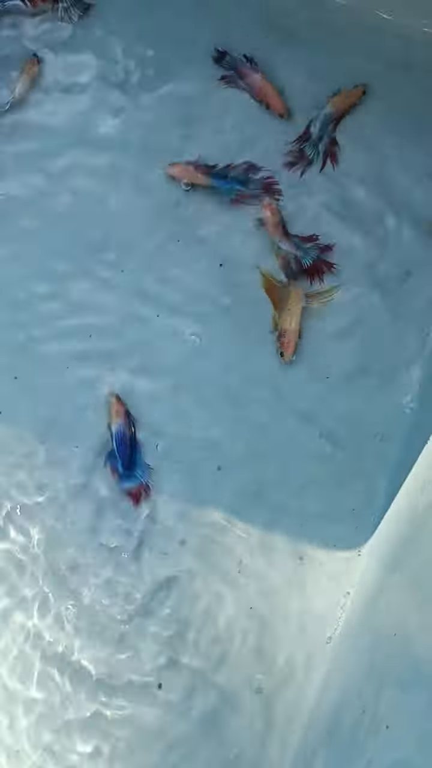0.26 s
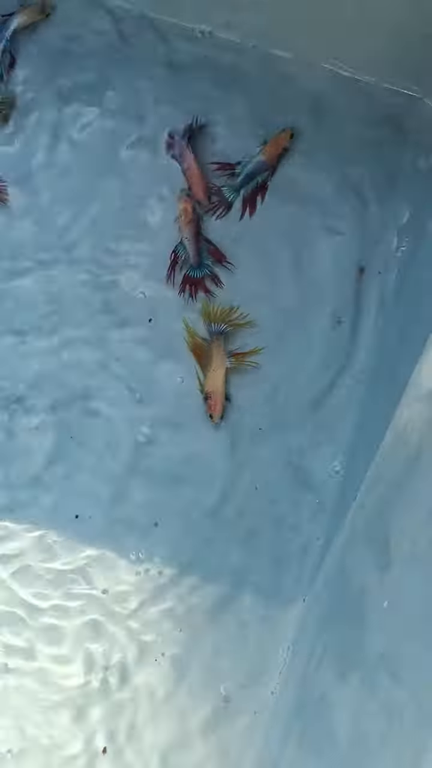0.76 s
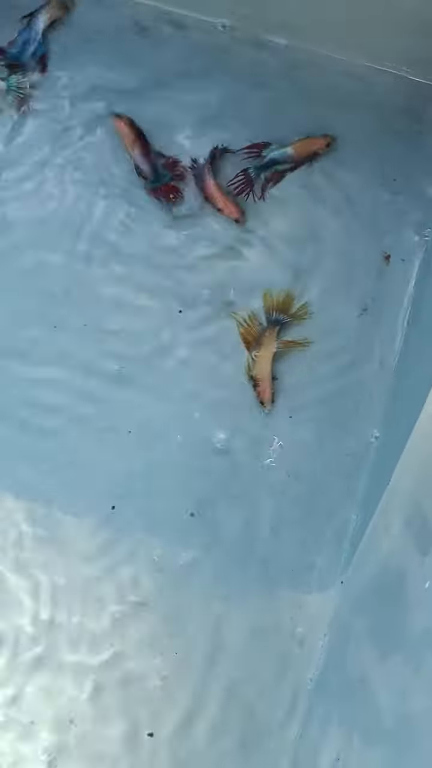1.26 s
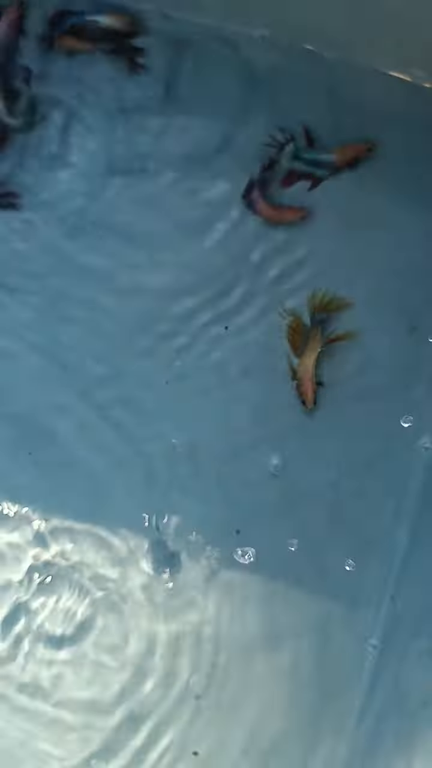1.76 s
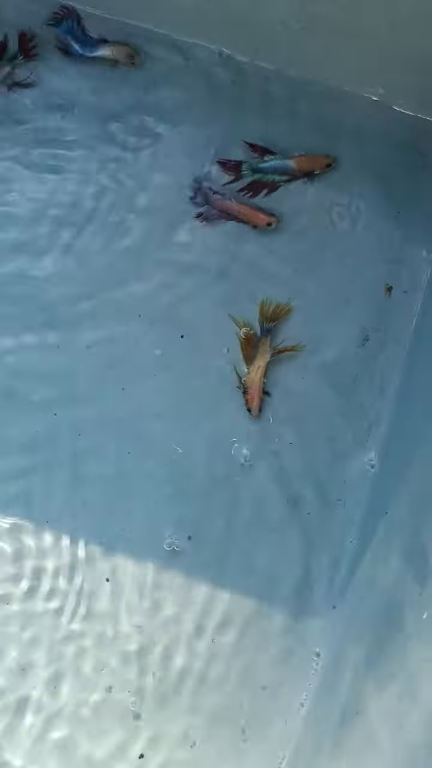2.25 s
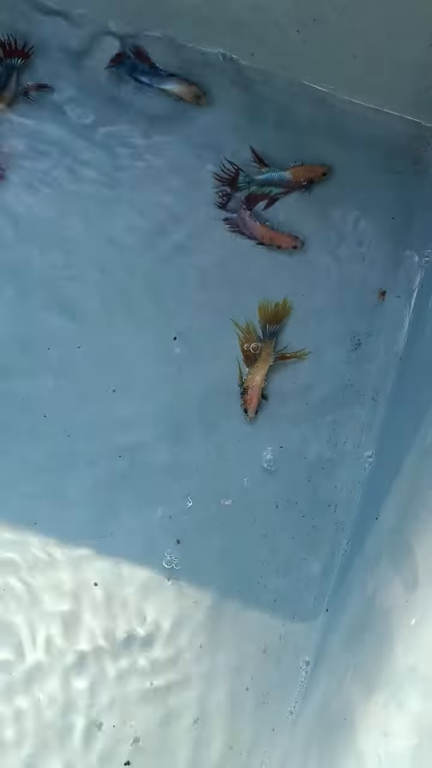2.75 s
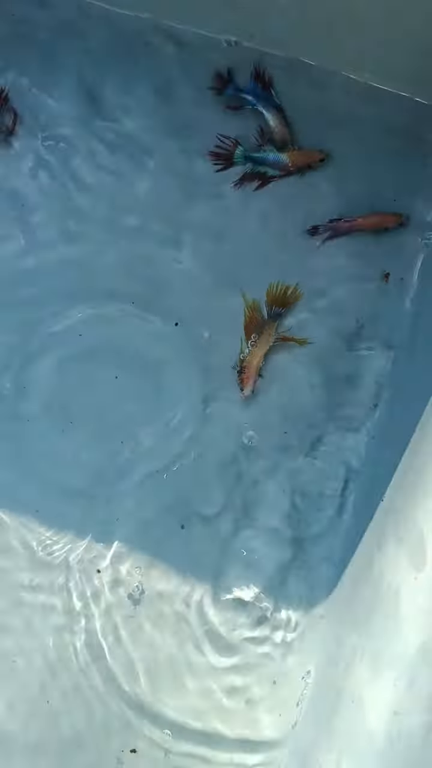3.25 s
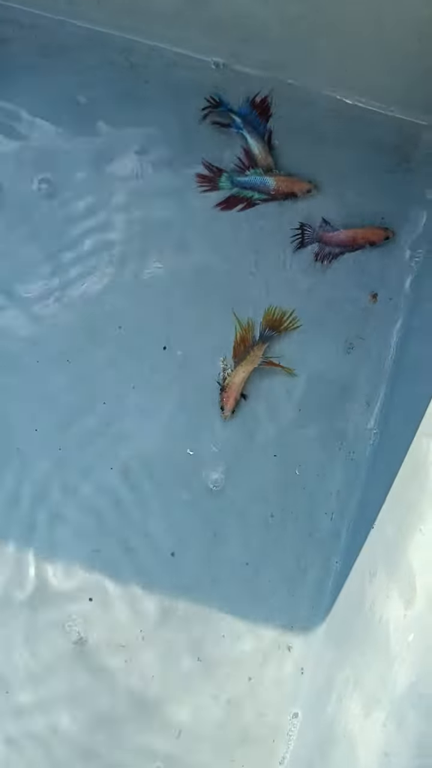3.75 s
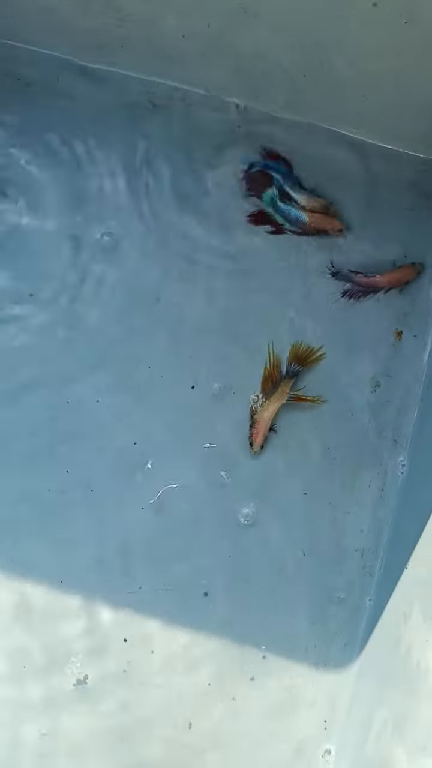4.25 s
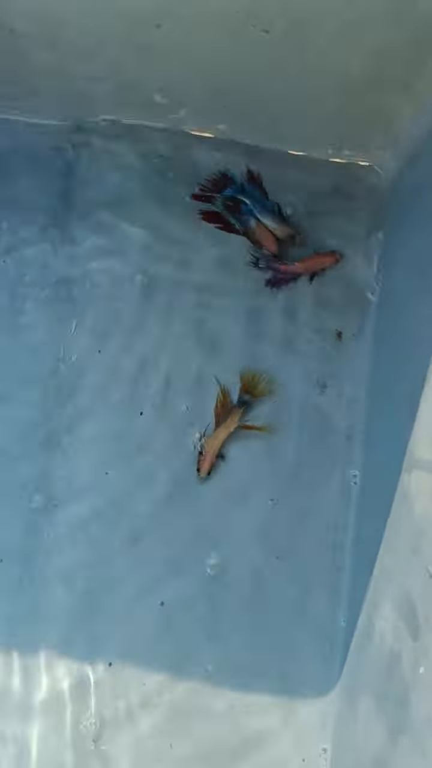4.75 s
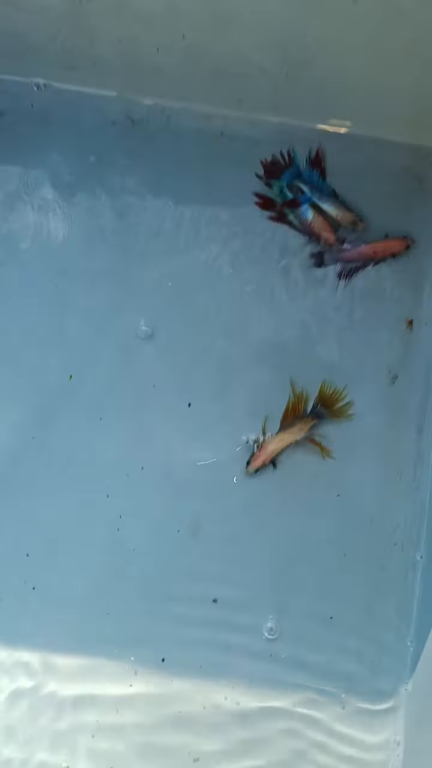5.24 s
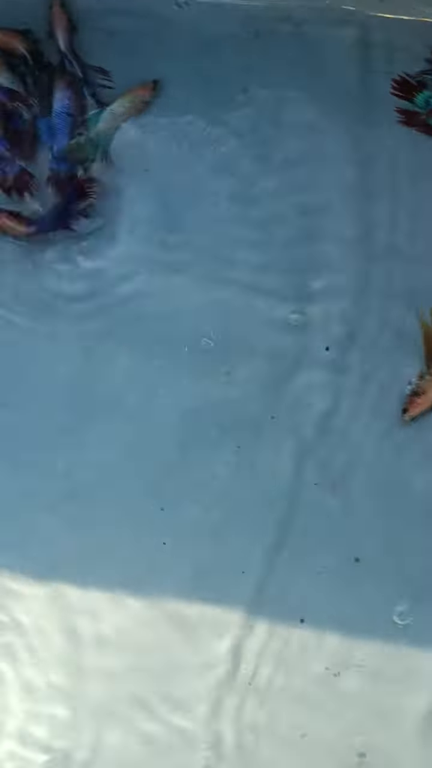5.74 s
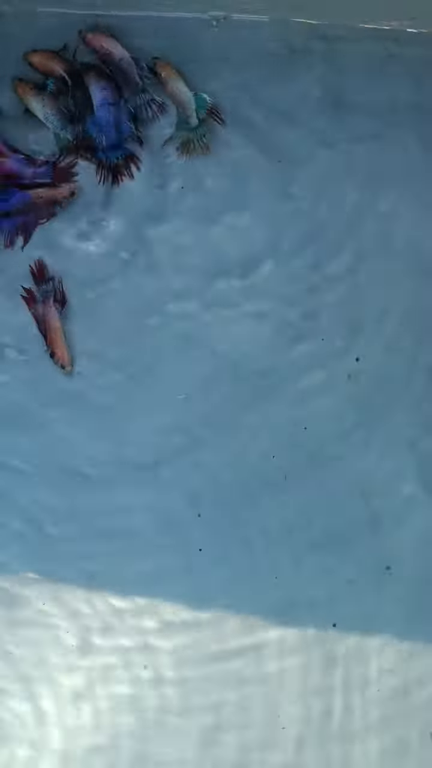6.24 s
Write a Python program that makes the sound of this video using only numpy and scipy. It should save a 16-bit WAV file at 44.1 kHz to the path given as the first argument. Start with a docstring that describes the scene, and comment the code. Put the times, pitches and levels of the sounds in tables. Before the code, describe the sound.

Irregular splashing of shallow water with small fish, heard from very near. High ringing drips and light flicks alternate with crackling slaps and fizzing spray; low booms mark shoves of water. A big dipping slosh with deep bubbly gulps is the loudest moment, followed by smaller slaps, a quieter gap and a few final plips. Stereo, tight plastic reflections, faint airy background.

```python
"""Sloshing in a fish tub

Close up, water is scooped and sloshed in a shallow plastic tub of small fish.
Drops and fin flicks ring tiny decaying sines, and slaps crack as coloured noise bursts with a dull body.
Trapped air gulps as low, spluttering rings; shoves of water boom lower, and like-sized bubbles ring in clouds.
Stirred water fizzes and gurgles as swarms of random bubbles, and sheets of water rush as hollow noise.
The walls add a very short, dense echo; a soft hiss, a low rumble and faint ripples lie underneath."""
import sys
import numpy as np
from scipy import signal
from scipy.fft import rfft, irfft, next_fast_len
from scipy.io import wavfile
from scipy.ndimage import uniform_filter1d

SR = 44100
rng = np.random.default_rng(int(sys.argv[2]) if len(sys.argv) > 2 else 0)


def output_pcm(signal):
    """Save a mono or channel-first signal as 16-bit PCM at the path in sys.argv[1].

    Samples are clipped to [-1, 1] before scaling.
    """
    pcm = np.clip(np.atleast_2d(signal).T, -1, 1) * 32767
    wavfile.write(sys.argv[1], SR, np.round(pcm).astype(np.int16))


N = 286209  # length in samples


def undb(db):
    """Decibels to gain."""
    return 10 ** (np.asarray(db) / 20)


def rms(x):
    """Root mean square of the middle of a stereo pair."""
    return np.sqrt(np.mean(x.mean(0) ** 2))


def peak(x, db):
    """Scale a stereo pair so that the crests of its loudest millisecond reach about db."""
    power = uniform_filter1d(np.mean(x ** 2, 0), SR // 1000)
    return x * undb(db) / np.sqrt(2 * power.max())


def pan(db):
    """Left and right gains for a left-minus-right level difference."""
    return undb(np.array([[db], [-db]]) / 2)


def add(out, s, sound):
    """Mix a short sound into out at time s."""
    i = max(int(s * SR), 0)
    out[:, i:i + sound.shape[1]] += sound[:, :max(N - i, 0)]


def on_bins(table, n):
    """The columns of a frequency table on the bins of an n-point transform."""
    hz, *columns = np.transpose(table)
    bins = np.maximum(np.arange(n // 2 + 1) * SR / n, 1)
    return [np.interp(np.log(bins), np.log(hz), c) for c in columns]


def colour(x, table, size=4096):
    """Minimum-phase filter with the given spectrum, so that attacks stay sharp."""
    cepstrum = irfft(np.log(undb(on_bins(table, size)[0])))
    # fold the cepstrum onto positive time to make the filter causal
    cepstrum[1:size // 2] *= 2
    cepstrum[size // 2 + 1:] = 0
    response = irfft(np.exp(rfft(cepstrum)))
    return signal.fftconvolve(x, response[None], axes=1)[:, :x.shape[1]]


# the two microphone ports: (f/Hz, likeness from -1 to 1, left minus right level/dB)
PORTS = [(80,0.82,0),(250,0.84,-0.5),(398,0.84,1),(664,0.17,-2.5),(1380,-0.35,-2.5),(2530,-0.17,-3),(3970,-0.026,-4.5),(7840,-0.15,0.5),(15000,0.17,5)]


def ports(x, lean=1):
    """Two unrelated signals become a stereo pair: alike in the bass, apart in the treble."""
    n = next_fast_len(x.shape[1], True)
    likeness, lean_db = on_bins(PORTS, n)
    likeness = np.clip(likeness, -.99, .99)
    mid, side = rfft(x, n) * np.sqrt([1 + likeness, 1 - likeness])
    lean_gains = undb(lean * np.array([lean_db, -lean_db]) / 2)
    return irfft(np.array([mid + side, mid - side]) * lean_gains, n)[:, :x.shape[1]]


def fade(t, t60):
    """Exponential decay of 60 dB in t60."""
    return undb(-60 * t / t60)


def walk(rate):
    """Smooth random wander with a spread near 1, taking rate new values a second."""
    k = int(SR / rate)
    return uniform_filter1d(np.repeat(rng.standard_normal(N // k + 1), k), k)[:N]


def bubble(hz, t60, rise, swell):
    """A pocket of air sets in within swell cycles or so and rings down, rising as it nears the surface."""
    t = np.arange(int(t60 * SR) + 2) / SR
    ring = np.sin(2 * np.pi * hz * t * (1 + rise * t / t60))
    return ring * fade(t, t60) * (1 - np.exp(-t * hz / swell))


def tub(sound, wall_db, t60, size=3072):
    """The direct sound and the dense echoes of the tub walls, drawn afresh for every spot on the water."""
    t = np.arange(size) / SR
    echoes = ports(rng.standard_normal((2, size)), lean=0) * fade(t, t60)
    echoes *= undb(wall_db) / np.sqrt(np.sum(echoes ** 2) / 2)
    echoes[:, 0] += 1  # direct sound
    return signal.fftconvolve(sound[None], echoes, axes=1)


def swarm(rate, low_hz, high_hz, cycles, spread_db, table, rush, rise=0.14):
    """Countless small bubbles of random size and strength over a share of smooth rush, near unit level."""
    out = np.zeros((2, N))
    # rate is in bubbles a second; each bubble draws five random numbers
    for when, pitch, strength, damping, place in rng.random((int(rate * N / SR), 5)):
        hz = low_hz * (high_hz / low_hz) ** pitch
        gain = undb(-spread_db * np.log(0.16 + strength)) * hz / high_hz
        spot = np.array([[np.cos(2 * np.pi * place)], [np.sin(2 * np.pi * place)]])
        ring = bubble(hz, cycles * (.5 + damping) / hz, rise=rise, swell=0.059)
        add(out, when * N / SR, spot * gain * ring)
    bubbles = colour(ports(out), table)
    flow = colour(ports(rng.standard_normal((2, N))), table)
    return (bubbles / rms(bubbles) + rush * flow / rms(flow)) / np.hypot(1, rush)


def stroke(start, attack, length, swell_db, t60):
    """Envelope of one stroke: an attack, a hold that swells or sags steadily, and a release."""
    t = np.arange(N) / SR - start
    hold = undb(swell_db * (np.clip(t / length, 0, 1) - .5))
    return np.clip(t / attack, 0, 1) * hold * fade(np.maximum(t - length, 0), t60)


# spectrum of the steady air: (f/Hz, relative level/dB per Hz)
AIR_COLOUR = [(15, -76), (25, -55), (53, -5.5), (123, -3.5), (270, -10), (476, -17), (796, -20), (863, -21),
              (1070, -17), (1290, -21), (2110, -17), (3720, -19), (6210, -29.5), (7920, -41),
              (16000, -59.5)]
# spectrum of fine spray, also of the ticks and floating rings: (f/Hz, relative level/dB per Hz)
SPRAY_COLOUR = [(700,-17),(1300,-5),(2000,-1),(2750,-6.5),(3700,1),(5000,-6.5),(6400,-10),(8000,-28),(10500,-28.5),(13000,-48),(15500,-43)]
# spectrum of gurgling water, also of the laps and the slap bodies: (f/Hz, relative level/dB per Hz)
GURGLE_COLOUR = [(25,-32),(55,-19),(90,-9),(220,-7),(330,-3),(470,-2.5),(590,-10.5),(740,2.5),(950,-14.5),(1300,-8.5),(2000,-12),(4000,-64)]


def ambience(air_db=-48, trickle_db=-63, lap_db=-64, ring_db=-66, mirror=0.3):
    """A wavering hiss and rumble split from one noise, and faint ticks, laps and rings of ripples."""
    air = colour(ports(rng.standard_normal((2, N))), AIR_COLOUR)
    air *= undb(air_db) / rms(air)
    rumble = signal.sosfiltfilt(signal.butter(2, 220, fs=SR, output="sos"), air)
    # the water mirrors the hiss; the path changes as the microphone sways, so its colour drifts
    i = np.arange(N)
    lag = SR * 0.001065 * (1 + 0.25 * walk(2.2))
    hiss = np.array([h + mirror * np.interp(i - lag, i, h) for h in air - rumble])
    hiss /= np.hypot(1, mirror)
    trickle = swarm(rate=110, low_hz=1800, high_hz=11000, cycles=90, spread_db=2.5,
                    table=SPRAY_COLOUR, rush=0)
    laps = swarm(rate=60, low_hz=300, high_hz=2000, cycles=35, spread_db=2.5,
                 table=GURGLE_COLOUR, rush=0)
    # small bubbles float at the surface and ring on
    rings = swarm(rate=16, low_hz=1700, high_hz=3600, cycles=380, spread_db=1.8,
                  table=SPRAY_COLOUR, rush=0, rise=.02)
    air_bed = hiss * undb(.5 * walk(5.5)) + rumble * undb(2 * walk(9.8))
    ripples = undb(trickle_db) * trickle + undb(lap_db) * laps + undb(ring_db) * rings
    return air_bed + ripples


# strokes that stir the water:
# (start t/s, attack t/s, length t/s, spray level/dB, gurgle level/dB, swell over the stroke/dB)
STIRS = [(0.805,0.029,0.045,-43.5,-50.5,5),(0.906,.04,0.13,-47.5,-43.5,0.5),(1.036,0.021,0.14,-43.5,-52.5,7),(2.123,0.0069,0.077,-36,-45,-8),(2.547,0.036,0.097,-38.5,-43,-12),
         (2.683,0.0094,0.044,-42,-57,0),(3.824,0.011,0.061,-34,-39.5,-6),(3.913,.008,0.18,-44,-52,7),(4.064,0.0045,0.025,-41,-29,-11),(4.104,0.014,0.036,-43,-38.5,9.5),
         (4.266,.008,0.026,-42.5,-43.5,5),(4.409,0.011,.19,-34.5,-28,2),(4.609,0.0074,0.071,-37,-25.5,3.5),(4.711,.008,.02,-32.5,-29,-16),(5.036,0.01,0.048,-34,-40.5,-4),
         (5.1,.01,0.25,-65,-51,-8),(5.692,0.0064,0.039,-52,-40.5,-4),(5.846,0.0073,0.067,-48,-49.5,14.5),(5.995,0.0069,0.023,-56,-39.5,-3),(6.06,.008,0.037,-60,-41,-3),(6.229,0.0057,0.0099,-43,-36,-7),
         (6.34,.008,0.082,-67,-45.5,5.5)]
SPRAY_T60_S, GURGLE_T60_S = 0.076, 0.13  # the foam settles after a stroke
SURGE_HZ, SURGE_DB = 68.3, 1.5  # the water surges unevenly during a stroke


def churn():
    """Stirred water throws fine spray and folds in larger bubbles that gurgle, both over a smooth rush."""
    out = np.zeros((2, N))
    spray = swarm(rate=3600, low_hz=900, high_hz=15000, cycles=20, spread_db=4.2,
                  table=SPRAY_COLOUR, rush=.3)
    gurgle = swarm(rate=1500, low_hz=73.6, high_hz=1520, cycles=14.7, spread_db=3.5,
                   table=GURGLE_COLOUR, rush=0.62)
    for start, attack, length, spray_db, gurgle_db, swell_db in STIRS:
        out += spray * undb(spray_db) * stroke(start, attack, length, swell_db, SPRAY_T60_S)
        out += gurgle * undb(gurgle_db) * stroke(start, attack, length, swell_db, GURGLE_T60_S)
    return out * undb(SURGE_DB * walk(SURGE_HZ))


# sheets of water that rush along the tub:
# (start t/s, attack t/s, length t/s, level/dB, swell over the sheet/dB)
SHEETS = [(4.414,0.015,.095,-34.5,-1),(4.527,0.013,0.086,-26.5,3),(4.615,.015,0.064,-32,-8),(5.076,0.013,.125,-44.5,-5.5),(5.368,0.015,0.018,-41.5,3)]
# hollow spectrum of a rushing sheet: (f/Hz, relative level/dB per Hz)
SHEET_COLOUR = [(120,-16.5),(400,0),(580,-9),(760,-1.5),(950,-1),(1200,-5),(1450,-2.5),(1900,-10),(2350,-9),(2750,-2),(3300,-5),(3750,-3),(4300,-6.5),(6000,-15.5),(8000,-31),(13000,-50)]


def sheets(surge_db=2.5, surge_hz=90, t60=0.074):
    """A sheet of water runs along the tub: coloured noise in a hollow, surging rush."""
    rush = colour(ports(rng.standard_normal((2, N))), SHEET_COLOUR)
    level = np.zeros(N)
    for start, attack, length, db, swell_db in SHEETS:
        level += undb(db) * stroke(start, attack, length, swell_db, t60)
    return level * undb(surge_db * walk(surge_hz)) * rush / rms(rush)


# heavy shoves of water that boom in the tub: (t/s, peak level/dB, f/Hz, ring-down t60/s)
BOOMS = [(0.786,-34.5,76,0.37),(1.642,-30,85,0.19),(1.872,-33,100,0.083),(1.9,-22.5,97.4,0.079),(2.774,-36,86,0.52),(4.112,-28.5,111,0.079),(4.691,-26.5,66.8,0.42),(4.653,-24.5,95,0.24),(4.736,-26,86.4,0.33)]


def booms():
    """Shoves of the whole water mass ring as very low bubbles that start abruptly and ring down."""
    out = np.zeros((2, N))
    for s, db, hz, t60 in BOOMS:
        boom = tub(bubble(hz, t60, rise=0.015, swell=0.18), wall_db=3.5, t60=0.024)
        add(out, s, peak(boom, db))
    return out


# clouds of like-sized bubbles that ring together: (t/s, length t/s, peak level/dB, f/Hz)
CLOUDS = [(0.935,.05,-35,414),(4.066,0.029,-24,3470),(4.106,0.062,-33.5,3480),(4.124,0.043,-30,427),(4.13,.028,-31.5,1105),(4.442,0.088,-19,2734),(4.505,0.12,-20.5,3700),(4.51,.115,-19,2704),(4.558,.14,-31,740),(6.329,0.056,-33.5,868)]


def clouds(cycles=110):
    """Many bubbles of one size, jostled without pause, hold a rough ringing pitch."""
    out = np.zeros((2, N))
    for s, length, db, hz in CLOUDS:
        n = int(length * SR)
        jostle = rng.standard_normal((2, n)) * signal.windows.tukey(n, .5)
        ring = bubble(hz, min(cycles / hz, .05), rise=0, swell=0.41)
        cloud = signal.fftconvolve(jostle, ring[None], axes=1)
        add(out, s, peak(cloud * pan(-6.0), db))
    return out


# pockets of trapped air: (t/s, peak level/dB, f/Hz)
GULPS = [(1.620,-35.5,750),(1.622,-38,420),(1.793,-38.5,796),(1.096,-32.5,700),(1.163,-29.5,676),(2.129,-24,1160),(2.14,-33.5,578),(2.158,-30,1170),(2.632,-29,1250),(2.654,-31.5,720),(2.825,-41,1140),(3.109,-36,1037),(3.807,-24.5,402),(3.803,-30.5,1162),
         (4.063,-17,440),(4.064,-19.5,705),(4.068,-24,222),(4.079,-20.5,485),(4.079,-22,700),(4.130,-30,1066),(4.400,-5.5,425),(4.411,-11.5,494),(4.455,-14.5,1400),(4.473,-17.5,1450),
         (4.516,-17,730),(4.549,-17,1480),(4.606,-25,404),(4.657,-22,357),(4.681,-15.5,825),(4.683,-13.5,356),(4.714,-19.5,866),(4.874,-31.5,695),(5.11,-34,1250),(5.175,-40,706),(5.321,-41,758),(5.325,-42,1150),(5.419,-35.5,700),(5.42,-35.5,1080),
         (5.672,-31,985),(5.902,-29.5,726),(6.237,-35,703),(6.058,-25.5,1690),(6.335,-36,800),(6.352,-37.5,1205),(6.372,-34,960),(6.410,-35.5,705),(6.425,-39,1000)]
GULP_CYCLES = 31  # a pocket dies away by 60 dB within this many cycles


def gulps(splutter_db=-14, size=6144):
    """Big air pockets ring low and splutter as they break up."""
    out, t = np.zeros((2, N)), np.arange(size) / SR
    port_hz, _, lean_db = np.transpose(PORTS)
    for s, db, hz in GULPS:
        t60 = GULP_CYCLES / hz
        ring = tub(bubble(hz, t60, rise=0.032, swell=0.67), wall_db=-8, t60=0.098)
        shreds = ports(rng.standard_normal((2, size)), lean=0) * fade(t, 2 * t60)
        shred_ring = bubble(0.88 * hz, 5 / hz, rise=0, swell=0.38)
        splutter = signal.fftconvolve(shreds, shred_ring[None], axes=1)
        place = pan(np.interp(hz, port_hz, lean_db))
        add(out, s, peak(ring * place, db))
        add(out, s, peak(splutter * place, db + splutter_db))
    return out


# drops that ring tiny bubbles: (t/s, first bubble's peak level/dB, its f/Hz, second bubble's f/Hz)
DROPS = [(0.0188,-18.5,3180,2890),(0.086,-32,3290,3800),(0.1519,-25,4300,4550),(0.26,-31.5,4230,5270),(0.7494,-26.5,4600,3500),(0.956,-33.5,5000,4300),(0.9727,-31,4570,5200),(0.991,-33,4700,3900),(1.0366,-34,4900,5500),(1.078,-27,4900,3800),(1.291,-31,3250,3800),
         (1.5546,-30,3340,3600),(1.6407,-23.5,3080,2500),(1.698,-25.5,2370,4600),(1.723,-34,3000,2500),(1.854,-36,3600,3860),(1.9053,-30.5,6450,7000),(1.923,-29.5,6740,6700),(2.326,-23.5,3250,3900),
         (2.4005,-27,3500,4070),(2.4425,-19,3530,4120),(2.482,-26.5,4570,5100),(3.1446,-31.5,3380,3900),(3.215,-37.5,7800,6400),(3.57,-23.5,2700,3370),
         (3.787,-19.5,4130,4830),(5.7956,-26,3720,4100),(6.0396,-23,3740,4100),(6.1018,-19.5,4020,4830)]
# bright spectrum of a splash or slap: (f/Hz, relative level/dB per Hz)
SLAP_COLOUR = [(150,-39),(400,-8),(1000,7),(2000,8),(3600,10.5),(5200,6.5),(6500,-3.5),(8000,-17),(10500,-23.5),(13000,-46.5),(15500,-36)]
DROP_PAN_DB = -8.5  # left minus right: the drops sit to the right


def drops(cycles=34, tick_db=-11, tick_t60=0.021, partner_db=-6, size=3072):
    """Each drop splashes on the surface and leaves two tiny, quickly damped bubbles."""
    out, t = np.zeros((2, N)), np.arange(size) / SR
    for s, db, hz, second_hz in DROPS:
        for pitch, share_db in ((hz, 0), (second_hz, partner_db)):
            ring = tub(bubble(pitch, cycles / hz, rise=0.013, swell=1.0), wall_db=4.2, t60=0.017)
            add(out, s, peak(ring * pan(DROP_PAN_DB), db + share_db))
        splash = rng.standard_normal((2, size)) * (fade(t, tick_t60) + 0.26 * fade(t, 0.27))
        tick = colour(splash, SLAP_COLOUR) * pan(DROP_PAN_DB / 2)
        add(out, s, peak(tick, db + tick_db))
    return out


# slaps of water on water:
# (t/s, peak level/dB, burst bubble's f/Hz, left minus right level/dB, ring-down t60/s)
SLAPS = [(0.6767,-26.5,3670,-7,0.057),(1.004,-26,3330,-13,0.049),(1.0678,-28.5,5000,-2,.06),(1.0955,-18,4460,-6,0.027),(1.124,-30,4900,-7,.03),(1.1294,-17.5,3680,-9,0.031),
         (1.1381,-17.5,3800,-2,0.035),(1.149,-25,3100,-2,0.043),(1.1624,-22,2420,-4,0.038),(1.6945,-26,4560,-6,0.031),
         (2.0745,-16.5,6100,-3.5,0.0089),(2.0835,-22,5950,1,0.035),(2.108,-24,5200,-2,.015),(2.115,-15,4400,0,0.028),(2.1276,-14,2090,-3,0.055),
         (2.1572,-22,1930,0,0.024),(2.171,-21.5,3630,-10,0.023),(2.2074,-31.5,4440,-2,0.038),(2.6,-21,3950,-1,0.033),(2.6172,-14,4530,-6,0.015),(2.6306,-8.5,3120,-4.5,0.019),(2.6521,-18,2120,-5.5,0.046),(2.6899,-20.5,5640,-2.5,0.03),(2.7209,-21.5,4770,-1,0.016),
         (3.7977,-6,3830,-2.5,0.024),(3.89,-10,3540,0,0.02),(3.9083,-4.5,5070,0,0.016),(4.0261,-7,4330,0,0.028),(4.0633,-10,3370,-3,0.012),
         (4.288,-29,2970,1,0.06),(4.34,-36,4300,-4,0.058),(4.3983,-11,5600,2,0.081),(4.421,-15.5,3770,-6,0.056),(4.453,-11.5,3430,-4,0.022),(4.473,-11,2780,-3,0.04),
         (4.5172,-8.5,3550,-7,0.053),(4.5487,-12.5,2760,-6,0.067),(4.6037,-9,3480,-6,0.025),(4.681,-11.5,3220,0.5,0.049),(4.7135,-18.5,3490,-5,0.061),(4.7515,-29,3270,-5,0.03),
         (4.87,-14,4070,-6,0.044),(4.936,-27,4300,-4,0.035),(4.9417,-17.5,3710,-4.5,0.036),(4.9789,-27,2940,-4,0.045),(5.016,-25,4130,-4,0.051),(5.0461,-19,2410,2.5,0.031),
         (5.8913,-18.5,3370,-8,0.035),(5.898,-9.5,3200,-4,0.03),(6.056,-9,3680,-2.5,0.029),(6.0586,-16.5,2170,-1,0.037)]
# dull body of a full-scale slap, and how many dB it grows per dB of slap
BODY_DB, BODY_GROWTH = -27.5, 0.53


def slaps(ring_db=-3, tail_db=-29, tail_t60=0.16, echo=0.59, snap_t60=0.036, thin_cycles=20, size=6144):
    """A slap is a crack that scatters round the tub, a burst bubble, and a duller body that comes just after."""
    out, t = np.zeros((2, N)), np.arange(size) / SR
    for s, db, hz, pan_db, t60 in SLAPS:
        scatter, wash = (ports(rng.standard_normal((2, size)), lean=0) for _ in range(2))
        contact = 1 - np.exp(-t / (0.01 * t60))  # longer slaps also land more softly
        decay = fade(t, t60) + undb(tail_db) * fade(t, tail_t60)
        crack = colour(scatter * contact * decay, SLAP_COLOUR)
        # the briefer the slap, the brighter its snap
        crack = crack + (snap_t60 / t60) ** 2 * np.diff(crack, prepend=0)
        # the nearest wall sends it back within a few milliseconds, which makes it hollow
        lag = int(SR * rng.uniform(0.00063, .0022))
        crack = crack + echo * np.pad(crack, ((0, 0), (lag, 0)))[:, :size]
        # a brief slap moves little water, so its crack is thin
        thin_hz = min(thin_cycles / t60, 3000)
        crack = signal.sosfilt(signal.butter(2, thin_hz, "high", fs=SR, output="sos"), crack)
        body = colour(wash * t * fade(t, 1.44 * t60), GURGLE_COLOUR)
        ring = tub(bubble(hz, 26 / hz, rise=0.011, swell=1.0), wall_db=6.5, t60=0.033)
        hit = peak(crack, 0)
        hit[:, :ring.shape[1]] += peak(ring, ring_db)
        add(out, s, peak(hit * pan(pan_db), db) + peak(body, BODY_DB + BODY_GROWTH * db))
    return out


def scene():
    """All the water sounds over the background."""
    background = ambience()
    stirred = churn() + sheets() + booms()
    bubbling = clouds() + gulps()
    return background + stirred + bubbling + drops() + slaps()


def record(dry, bass_hz=38, top_hz=16300):
    """The recorder sheds the deepest bass, clips at full scale and cuts the top."""
    lean = signal.sosfilt(signal.butter(2, bass_hz, "high", fs=SR, output="sos"), dry)
    clipped = np.clip(lean, -1, 1)
    return signal.sosfilt(signal.ellip(8, .2, 70, top_hz, fs=SR, output="sos"), clipped)


dry = scene()
out = record(dry)
output_pcm(out)
```